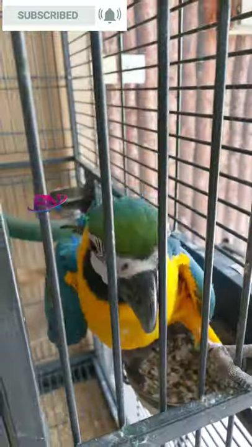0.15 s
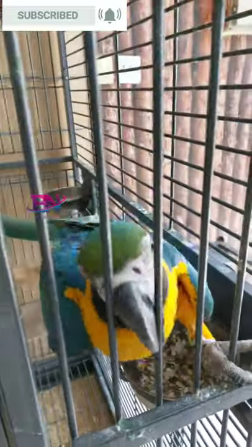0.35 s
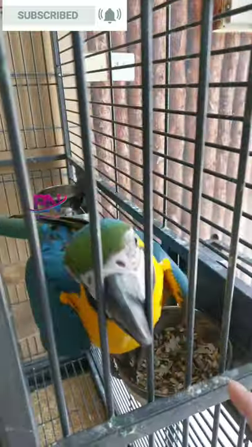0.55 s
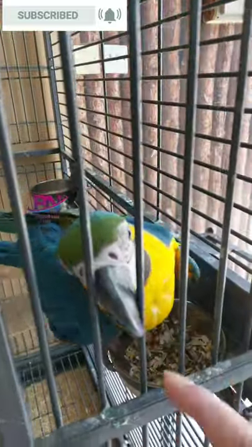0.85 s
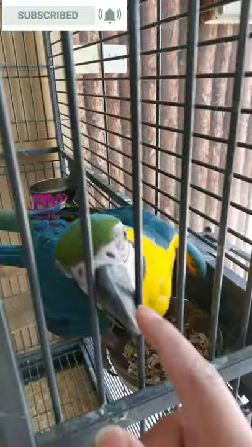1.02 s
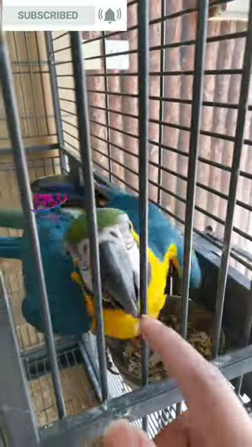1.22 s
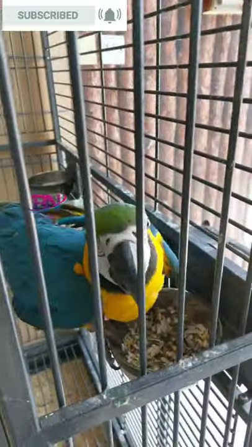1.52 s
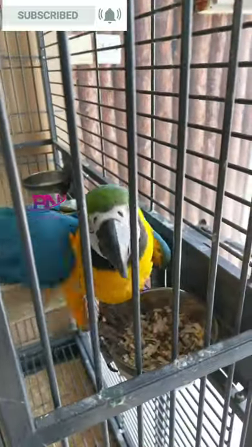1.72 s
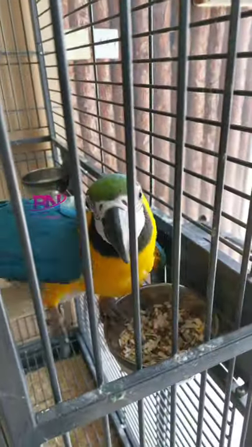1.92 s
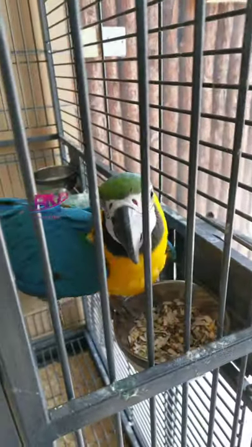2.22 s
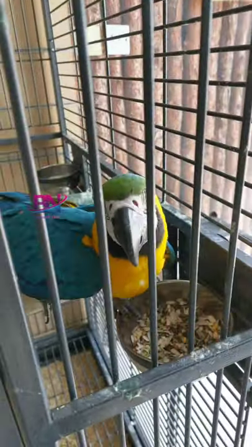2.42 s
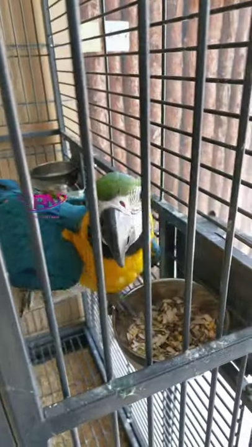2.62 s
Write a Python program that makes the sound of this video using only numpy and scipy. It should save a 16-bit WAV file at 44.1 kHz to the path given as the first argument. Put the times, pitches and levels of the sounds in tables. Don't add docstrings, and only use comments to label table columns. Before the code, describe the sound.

Large parrots squawk harshly in a hard-walled aviary, with two sharp tongue clicks and cage scuffs

```python
import sys
import numpy as np
from scipy import signal
from scipy.fft import rfft, irfft, next_fast_len
from scipy.io import wavfile
from scipy.ndimage import map_coordinates

SR = 44100
rng = np.random.default_rng(int(sys.argv[2]) if len(sys.argv) > 2 else 0)


def volts_from_decibels(level):
    exponent = np.asarray(level, float) / 20
    return 10 ** exponent


def waveform_to_disk(signal):
    frames = np.transpose(np.atleast_2d(signal))
    scaled = np.clip(frames, -1, 1) * 32767
    samples = np.round(scaled).astype(np.int16)
    wavfile.write(sys.argv[1], SR, samples)


N = 121275
LEAD = SR // 4

# start_s, length_s, level_db, pitch_hz, roughness_0_1
HOARSE_CALLS = [
    (-.08, 0.17, -27.5, 1658, .4),
    (.065, 0.091, -28, 1707, .22),
    (.108, 0.099, -24, 1590, .15),
    (.15, .19, -23, 1642, .85),
    (.325, 0.078, -31, 1647, .22),
    (.91, 0.241, -21, 1690, .52),
    (2.555, .38, -25, 1610, .97),
]
SHRILL_CALLS = [
    (.43, .075, -25, 1900, .08),
    (.5, 0.12, -32, 1895, .12),
    (.63, .1, -30, 1916, .62),
    (.7, 0.16, -26, 1985, .62),
    (.888, .05, -29, 1887, .2),
]
FAR_CALLS = [(.34, 0.14, -32, 1700, .4), (.36, .09, -35, 2120, .3), (.48, 0.12, -39, 1400, .6),
             (.97, 0.14, -37, 1366, .1), (1.06, 0.14, -38, 1460, .3), (1.04, 0.092, -34, 2350, .7),
             (1.184, .08, -26, 3240, .3), (1.2, .18, -31, 1956, .8), (1.22, .18, -33, 2720, .85),
             (.075, .09, -32, 2520, .15), (2.557, .07, -42, 2750, .2)]
# pitch_multiple, level_db
HOARSE_PARTIALS = [(1, -15), (1.5, -15), (2, 1), (3, 0), (4, -13), (5, -20), (6, -22), (7, -24)]
SHRILL_PARTIALS = [(1, -8), (2, 1), (3, -9), (4, -26), (5, -27), (6, -31)]
FAR_PARTIALS = [(1, 2), (2, -12), (3, -23.5)]
# freq_hz, density_db_per_hz
HOARSE_RASP = [(290, -48), (500, -19.5), (3230, -6), (4130, -11.5), (5050, -2.5), (6010, -14),
               (11800, -17.5), (14700, -32.5), (15800, -85)]
SHRILL_RASP = [(530, -67), (900, -44), (1370, -31), (2060, -9.5), (2990, -15.5), (3940, -14.5),
               (4280, -4.5), (8900, -21.5), (15800, -38)]
FAR_RASP = [(530, -64), (900, -25.5), (2060, -8), (4770, -28.5), (7340, -55), (9560, -35), (15800, -49.5)]
# freq_hz, gain_db
BEAK = [(300, -46.5), (900, -15.5), (1250, 2), (1500, 0.5)]
ATTACK_S, RELEASE_S, SWELL_DB_PER_S = 0.0056, 0.029, 47
DRIFT_RATIO, JITTER_RATIO, JITTER_HZ = .009, .02, 120
FLUTTER_DB, FLUTTER_HZ = 5, 70
BLUR_HZ = 330
TENSE_DB = 3
LEAK_SHARE = .022

# start_s, ring_db, peel_db, push_db, pitch_share_missing_at_first
CLICKS = [
    (2.1476, -2.5, -27, -15, .75),
    (2.442, -5.5, -34, -25, .3),
]
# freq_hz, density_db_per_hz
PEEL_TONE = [(1000, -29), (4000, -2), (6000, -4.5), (9000, -4), (12000, -2), (16000, -9)]
MOUTH_HZ, MOUTH_T60_S, OPENS_S = 2550, .0085, .0005
PEEL_LEAD_S, PEEL_S = .0018, .0055
PUSH_HZ, PUSH_T60_S = 620, .006
WALL_S, WALL_DB = .0072, -17

# start_s, level_db, t60_s, tilt_db_per_octave
SCUFFS = [(0.534, -37.5, 0.12, 6), (.607, -38, .06, 6), (1.334, -37, 0.44, 1.5), (1.378, -32, 0.14, 0.5),
          (1.405, -46.5, 0.27, -1), (1.724, -61, 0.095, 5), (1.816, -44.5, 0.49, -0.1),
          (1.855, -49.5, 0.29, 0.5), (1.954, -52.5, 0.33, -1.3), (2.043, -54, 0.143, 2),
          (2.056, -44.5, 0.53, .6), (2.099, -52, 0.26, -1.5), (2.14, -38.5, .04, 6.5),
          (2.435, -46, 0.039, 3)]
# freq_hz, density_db_per_hz
SCUFF_TONE = [(180, -28.5), (300, -3), (1020, -13), (1830, -3), (2060, -9.5), (4790, -11.5), (7500, -21),
              (9000, -12.5), (15800, -24)]
# freq_hz, level_db, t60_s
WIRE_MODES = [(1114, -5, 0.11), (1278, -0.5, 0.085), (1750, -6.5, 0.18), (1900, -6.5, 0.13),
              (2450, -17, .1), (3044, -3, .08), (8900, -7, .12)]
WIRE_DB = -2.5

# freq_hz, density_db_per_hz
TRAFFIC_TONE = [(20, -17.5), (75, -2), (160, -10.5), (400, -15), (800, -21.5), (2000, -26), (3500, -44),
                (16000, -48.5)]
# time_s, level_db
TRAFFIC_LEVEL = [(0.0, -51), (0.96, -52), (1.54, -50), (1.93, -50.5), (2.22, -51), (2.75, -42)]
DRONE_HZ, DRONE_DB = 102, -7.5

# freq_hz, t60_s
AVIARY_T60 = [(300, .5), (1500, .6), (4000, 0.5), (12000, 0.18)]
WET_DB, FAR_WET_DB, CLICK_WET_DB = -4.5, -4.5, -21
# freq_hz, gain_db
SPREAD = [(2500, -80), (4000, -36), (8000, -22), (12000, -10), (16000, -6)]
# freq_hz, gain_db
MICROPHONE = [(14500, 0), (15800, -2), (16100, -30)]


def unit(x):
    return x / np.sqrt(np.mean(x ** 2) + 1e-20)


def along(points, hz):
    f, v = np.transpose(points)
    return np.interp(np.log(hz + 1), np.log(f + 1), v)


def wobble(rate_hz, size):
    coarse = map_coordinates(rng.standard_normal(620), [np.arange(0, size + 16, 16) * rate_hz / SR])
    return np.interp(np.arange(size) / 16, np.arange(len(coarse)), coarse)


def filtered(x, gain_db):
    m = next_fast_len(x.shape[-1] + 4096)
    gain = volts_from_decibels(gain_db(np.fft.rfftfreq(m, 1 / SR)))
    return irfft(rfft(x, m) * gain, m)[..., :x.shape[-1]]


def hiss(spectrum, size, tilt_db=0):
    closed = [(spectrum[0][0] / 2, -70)] + list(spectrum)
    noise = rng.standard_normal(size)
    return unit(filtered(noise, lambda hz: along(closed, hz) + tilt_db * np.log2(hz / 2000 + 1e-3)))


def add(track, start_s, x):
    part = track[LEAD + round(start_s * SR):][:len(x)]
    part += x[:len(part)]


def partial(k, phase, rough, strain):
    size = len(phase)
    rate_hz = min(BLUR_HZ * k * rough + 30, 1200)
    blur = wobble(rate_hz, size) * np.sin(k * phase) + wobble(rate_hz, size) * np.cos(k * phase)
    share = np.clip(1.6 * strain, 0, 1)
    return np.sqrt(1 - share) * np.sin(k * phase + k) + np.sqrt(share / 2) * blur


def bird(calls, partials, rasp, glide, breathy, deep):
    out = np.zeros(N + LEAD)
    for start_s, length_s, level_db, pitch_hz, rough in calls:
        t = np.arange(SR // 4 if length_s < .2 else SR // 2) / SR
        size = len(t)
        u = np.clip(t / length_s, 0, 1)
        effort = np.sin(np.pi * u)
        strain = np.clip(rough * (.78 + .22 * effort), 0, 1)

        attack = np.clip(t / ATTACK_S, 0, 1)
        release = np.clip((length_s - t) / RELEASE_S + .5, 0, 1)
        shape = attack * release * volts_from_decibels(SWELL_DB_PER_S * length_s * (effort - 1))

        drift = DRIFT_RATIO * wobble(24.88, size)
        jitter = JITTER_RATIO * strain * wobble(JITTER_HZ, size)
        phase = 2 * np.pi * np.cumsum(pitch_hz * (1 + glide * (u - .5) + drift + jitter)) / SR

        tone = np.zeros(size)
        for k, partial_db in partials:
            flutter_db = FLUTTER_DB * wobble(FLUTTER_HZ, size) * (1 - strain)
            tense_db = TENSE_DB * max(k - 2, 0) * (effort - 1)
            tone += volts_from_decibels(partial_db + flutter_db + tense_db) * partial(k, phase, rough, strain)
        breath = hiss(rasp, size) * volts_from_decibels(1.5 * wobble(160, size))
        share = np.clip(LEAK_SHARE + breathy * strain ** 5.2, 0, 1)
        voice = np.sqrt(1 - share) * unit(tone) + np.sqrt(share) * breath
        voice = filtered(voice, lambda hz: along(BEAK, hz * (1 + deep * rough ** 6)))
        add(out, start_s, volts_from_decibels(level_db) * shape * voice)
    return out


def clicks():
    out, t = np.zeros(N + LEAD), np.arange(SR // 20) / SR
    for start_s, ring_db, peel_db, push_db, closed in CLICKS:
        turns = MOUTH_HZ * (t - np.clip(closed, 0, 1) * OPENS_S * (1 - np.exp(-t / OPENS_S)))
        onset = 1 - np.exp(-t / .0012)
        ring = -volts_from_decibels(ring_db - 60 * t / MOUTH_T60_S) * onset * np.sin(2 * np.pi * turns)
        push = -volts_from_decibels(push_db - 60 * t / PUSH_T60_S) * np.sin(2 * np.pi * PUSH_HZ * t)
        peel_shape = np.sqrt(np.abs(np.sin(np.pi * np.clip(t / PEEL_S, 0, 1))))
        peel = volts_from_decibels(peel_db) * hiss(PEEL_TONE, len(t)) * peel_shape
        add(out, start_s + OPENS_S - PEEL_LEAD_S, peel)
        add(out, start_s, ring + push)
        add(out, start_s + WALL_S, volts_from_decibels(WALL_DB) * (ring + push))
        add(out, start_s + 2 * WALL_S, volts_from_decibels(2.6 * WALL_DB) * ring)
    return out


def scuffs():
    out, t = np.zeros(N + LEAD), np.arange(SR // 3) / SR
    top_db = max(mode_db for _, mode_db, _ in WIRE_MODES)
    for start_s, level_db, t60_s, tilt_db in SCUFFS:
        grain_db = 3.6 * wobble(300, len(t))
        burst = hiss(SCUFF_TONE, len(t), max(tilt_db, 0)) * volts_from_decibels(grain_db - 60 * t / t60_s)
        ring = np.zeros(len(t))
        for hz, mode_db, mode_t60_s in WIRE_MODES:
            decay = volts_from_decibels(mode_db + rng.normal(0, 1.67) - 60 * t / mode_t60_s)
            ring += decay * np.sin(2 * np.pi * hz * t + rng.uniform(0, 6.1))
        ring *= volts_from_decibels(WIRE_DB - top_db - 4.5 * tilt_db)
        add(out, start_s, volts_from_decibels(level_db) * np.clip(t / 0.004, 0, 1) * (burst + ring))
    return out


def traffic():
    time_s, level_db = np.transpose(TRAFFIC_LEVEL)
    t = np.arange(-LEAD, N) / SR
    size = len(t)
    drone_level = volts_from_decibels(DRONE_DB + 4.9 * wobble(12, size))
    drone_hz = DRONE_HZ * (1 + .06 * wobble(11, size))
    drone = drone_level * np.sin(2 * np.pi * np.cumsum(drone_hz) / SR)
    level = volts_from_decibels(np.interp(t, time_s, level_db) + 0.33 * wobble(6.41, size))
    return level * (hiss(TRAFFIC_TONE, size) + drone)


def aviary(x):
    hz, t, z = signal.stft(rng.standard_normal(SR), SR, nperseg=256)
    decay = volts_from_decibels(-60 * t / along(AVIARY_T60, hz)[:, None])
    tail = signal.istft(z * decay, SR, nperseg=256)[1]
    delayed = np.pad(x, (300, 0))
    return signal.fftconvolve(delayed, tail / np.linalg.norm(tail))[:len(x)]


def scene():
    hoarse = bird(HOARSE_CALLS, HOARSE_PARTIALS, HOARSE_RASP, glide=-.025, breathy=.9, deep=.8)
    shrill = bird(SHRILL_CALLS, SHRILL_PARTIALS, SHRILL_RASP, glide=.01, breathy=6.5, deep=.05)
    far = bird(FAR_CALLS, FAR_PARTIALS, FAR_RASP, glide=-0.0303, breathy=1.4, deep=.05)
    near = hoarse + shrill
    tongue, cage = clicks(), scuffs()
    wet = volts_from_decibels(WET_DB) * aviary(near + volts_from_decibels(-7) * cage)
    wet += volts_from_decibels(FAR_WET_DB) * aviary(far)
    wet += volts_from_decibels(CLICK_WET_DB) * aviary(tongue)
    mid = (near + volts_from_decibels(-1.0) * far + cage + tongue + wet + traffic())[LEAD:]
    scatter = rng.standard_normal(400) / 20
    side = filtered(signal.fftconvolve(mid, scatter)[:N], lambda hz: along(SPREAD, hz))
    return np.array([mid + side, mid - side])


def top_cut(x):
    return signal.sosfilt(signal.butter(12, 15970, fs=SR, output="sos"), x)


def record(dry):
    mix = filtered(dry, lambda hz: along(MICROPHONE, hz))
    return top_cut(mix)


dry = scene()
out = record(dry)
waveform_to_disk(out)
```